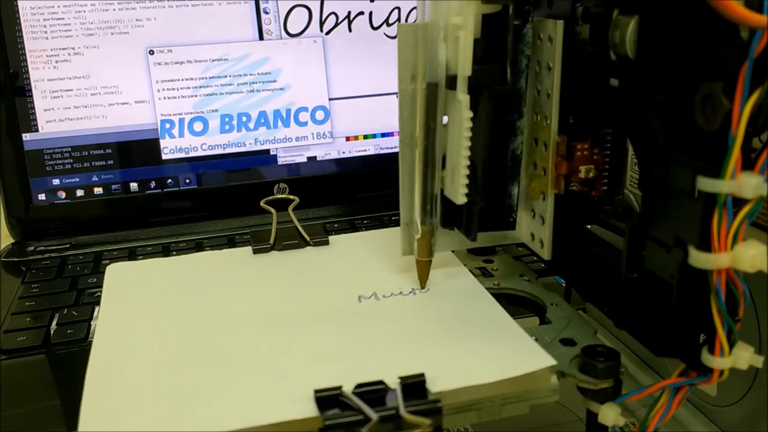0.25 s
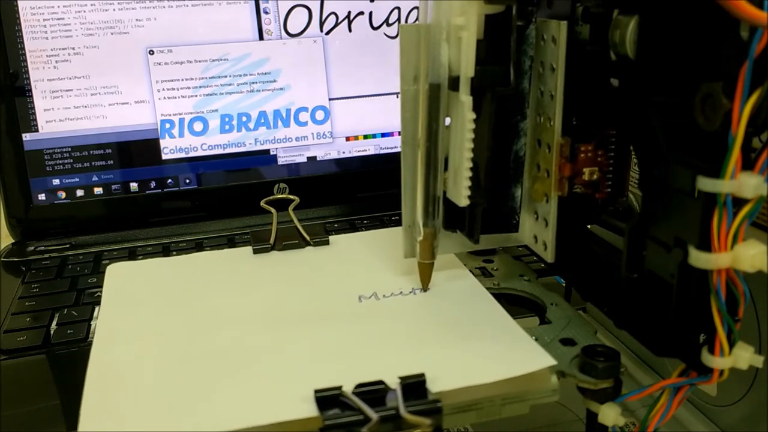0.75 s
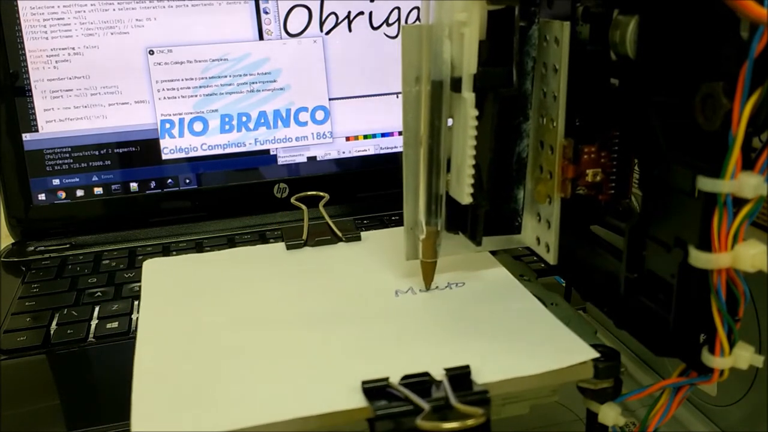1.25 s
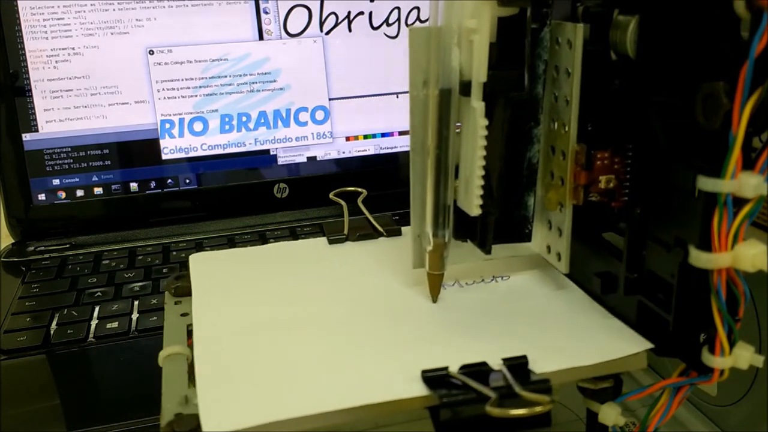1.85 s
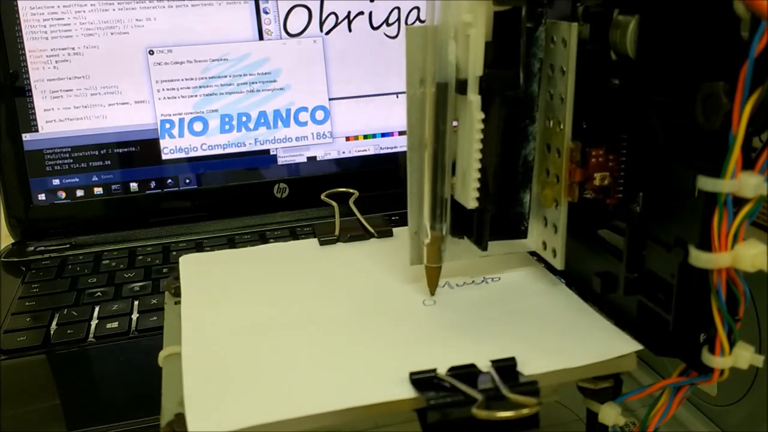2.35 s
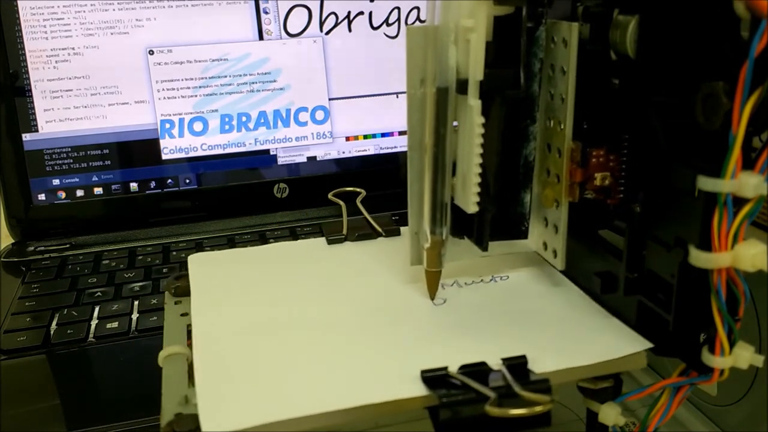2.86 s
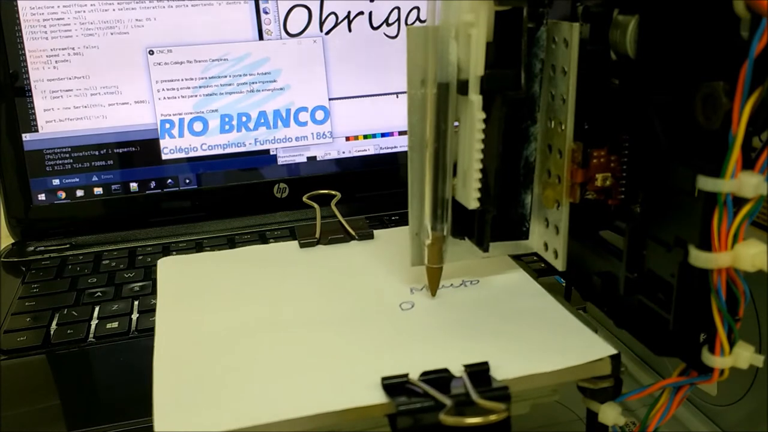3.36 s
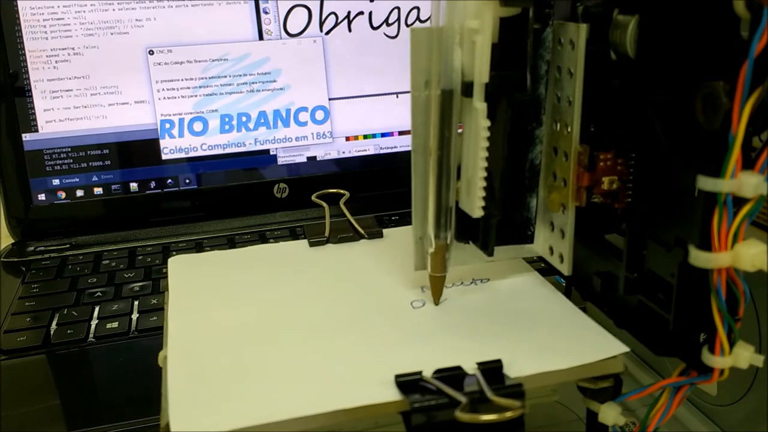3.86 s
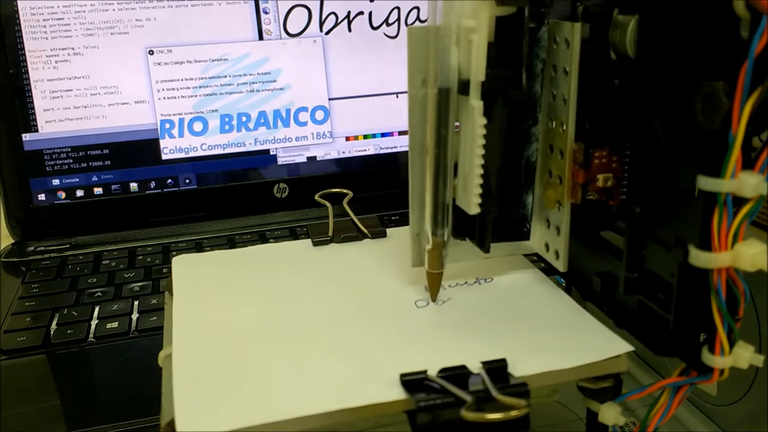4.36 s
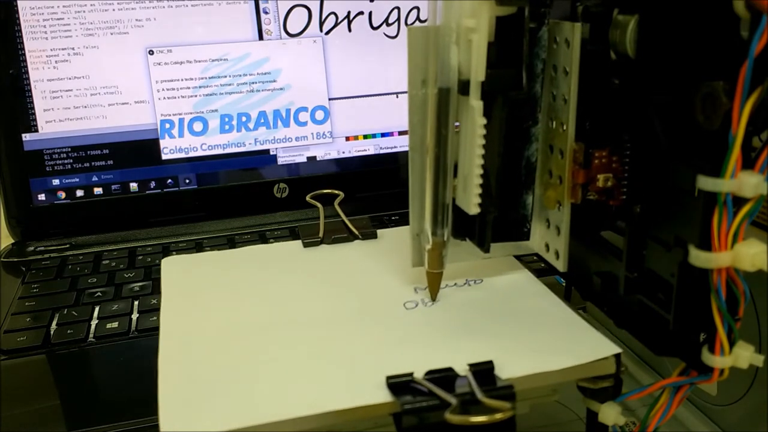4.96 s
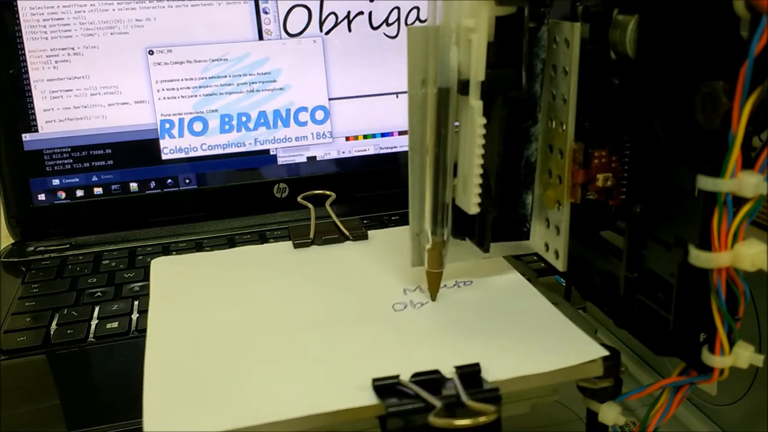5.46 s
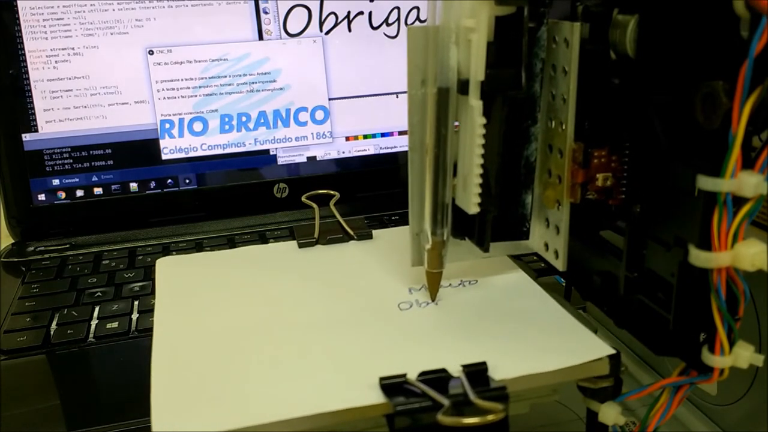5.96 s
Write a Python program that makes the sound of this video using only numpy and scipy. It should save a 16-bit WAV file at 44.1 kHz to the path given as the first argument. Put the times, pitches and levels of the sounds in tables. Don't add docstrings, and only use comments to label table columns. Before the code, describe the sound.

Close to the microphone, a small pen plotter writes with rapid irregular bursts of thin, high motor whine, each tiny step a buzzy chirp. About one second in, the stutter becomes a continuous rough whine for a long move, then the stepping returns louder. Short smooth hops interrupt it later. Underneath are a wavering laptop fan, airy hiss and faint far squeaks and clinks in an echoing room.

```python
import sys
import numpy as np
from scipy import signal
from scipy.fft import rfft, irfft
from scipy.io import wavfile
from scipy.ndimage import uniform_filter1d

SR = 44100
rng = np.random.default_rng(int(sys.argv[2]) if len(sys.argv) > 2 else 0)


def nominal_scale(level):
    x = np.asarray(level, float) / 20
    return 10 ** x


def to_wav(sig):
    pcm = np.clip(np.atleast_2d(sig), -1, 1) * 32767
    pcm = np.round(pcm).astype(np.int16)
    wavfile.write(sys.argv[1], SR, pcm.T)


N = 274302
CHOP_HZ = 1952.4


def evened(x):
    return x / np.sqrt(np.mean(abs(x) ** 2) + 1e-20)


def read(points, hz):
    f, value = np.transpose(points)
    return np.interp(np.log(hz + 1), np.log(f + 1), value)


def wander(width_hz, size=N):
    r = np.exp(-np.pi * width_hz / SR)
    z = rng.standard_normal(size) + 1j * rng.standard_normal(size)
    return evened(signal.lfilter([1], [1, -2 * r, r * r], z))


def air():
    # pitch_hz, level_db (per Hz)
    room = [(60, -46.5), (130, -46.5), (450, -16), (950, -13.5), (1500, -8.5), (3000, -11.5), (3550, -7.5),
            (4400, -13), (6800, -23), (8200, -18), (12200, -22), (13700, -32), (14100, -34), (15250, -28),
            (15700, -29)]
    frames, hz = N // 256 + 5, np.fft.rfftfreq(1024, 1 / SR)
    a, b, patches = rng.standard_normal((frames, 513, 3)).T
    patches = evened(uniform_filter1d(uniform_filter1d(patches, 8, 0), 14, 1))
    lumps = np.minimum(evened(uniform_filter1d(rng.standard_normal(frames), 16)), 1.5)
    lumps += np.interp(np.arange(frames) * 256 / SR, [.3, .6, 1.6, 2.2], [0, -.8, -.8, .3])
    lumps = lumps * np.clip(2.5 - hz[:, None] / 60, 0, 1)
    level_db = read(room, hz)[:, None] + 1.78 * patches + 8.5 * lumps
    noise = signal.istft((a + 1j * b) * nominal_scale(level_db), nperseg=1024, noverlap=768)[1][:N]
    return evened(noise) * nominal_scale(-38)


def far_clatter():
    # start_s, length_s, pitch_hz, level_db, glide_hz
    squeaks = [(0.15, 0.29, 1324, -46, -50.5), (0.33, .05, 1550, -47, 4), (0.43, 0.072, 1493, -42, 0),
               (1.518, 0.015, 3030, -43.5, -2), (2.22, .1, 2760, -43.5, -150),
               (2.25, 0.15, 2260, -42.5, 30.5), (2.28, 0.08, 2410, -39, -1), (2.7, .08, 2370, -44.5, 0),
               (2.86, .03, 2880, -43, 0), (3.04, .04, 2220, -46, 0), (3.22, 0.077, 2300, -44, -60),
               (3.31, 0.065, 2170, -41.5, -1), (3.29, .07, 2620, -46, 0), (3.28, 0.22, 2870, -49, -1),
               (3.869, 0.072, 2370, -42, 0), (4.41, 0.12, 1980, -42.5, 269), (4.53, 0.083, 2230, -45, -140),
               (4.9, 0.099, 2060, -45, 3), (5.38, .04, 2370, -48, -3), (5.5, 0.17, 1525, -49.5, 1)]
    # start_s, length_s, pitch_hz, level_db
    scrapes = [(0.284, 0.21, 4410, -43.5), (0.864, 0.16, 6880, -47.5), (1.59, 0.06, 4450, -44),
               (1.62, .04, 3430, -46), (1.66, 0.033, 4480, -42), (1.88, 0.04, 3260, -39.5),
               (2.091, 0.055, 2650, -42), (2.487, 0.046, 3090, -40), (2.54, 0.04, 2700, -39.5),
               (2.62, 0.08, 2660, -45), (4.271, 0.059, 3360, -39), (4.407, 0.13, 3260, -39.5),
               (5.246, .08, 4930, -47), (5.15, .05, 3050, -46), (5.535, 0.045, 3200, -36.5),
               (5.55, .08, 3550, -43), (5.645, 0.043, 3010, -43), (5.82, 0.038, 3120, -46)]
    # start_s, length_s, pitch_hz, level_db
    clinks = [(0.0, 0.053, 13100, -48), (0.113, 0.071, 9030, -45), (1.238, .07, 11280, -49),
              (2.864, .06, 8000, -47), (2.9, .06, 10900, -49), (5.516, 0.046, 10800, -38.5),
              (5.52, .08, 9060, -47.5), (5.516, 0.074, 12830, -50), (5.62, .04, 10400, -45),
              (5.65, .07, 9900, -47), (5.79, .03, 9700, -47), (5.815, 0.04, 10350, -42),
              (5.85, 0.14, 9530, -42)]
    # start_s, length_s, pitch_hz, level_db
    rustles = [(4.47, 0.24, 10560, -45.5), (5.44, .06, 10400, -48), (5.51, 0.08, 10760, -45),
               (5.619, 0.072, 10700, -46), (5.85, .12, 9700, -46), (5.8, 0.07, 11800, -47)]
    out = np.zeros(N)
    for rows, share in [(squeaks, .022), (scrapes, .09), (clinks, .035), (rustles, .17)]:
        for start, length, hz, db, *glide in rows:
            t = np.arange(int((length + 0.086) * SR)) / SR
            decay_db = -60 * np.maximum(t - 0.74 * length, 0) / (0.14 + 3.2 * length)
            shape = np.minimum(t / 0.006, 1) * nominal_scale(decay_db)
            grain = 0.5 + 0.5 * abs(wander(49, len(t)))
            turns = np.cumsum(hz + sum(glide) * np.minimum(t / length, 1)) / SR
            band = (wander(share * hz, len(t)) * np.exp(2j * np.pi * turns)).real
            part = out[round(start * SR):][:len(t)]
            part += (nominal_scale(db) * np.sqrt(2) * shape * grain * band)[:len(part)]
    return out


def fan_tones():
    # pitch_hz, width_hz, level_db, sink_s
    fan = [
        (245, 20, -76, 7),
        (442, 25, -64, 7),
        (484, 14, -56, 7),
        (517, 4, -55, 1.7),
        (605, 60, -62, 7),
        (779, 10, -55, .6),
        (785, 70, -61, 7),
        (700, 60, -63, 7),
        (960, 12, -64, 7),
    ]
    t = np.arange(N) / SR
    out = np.zeros(N)
    for hz, width_hz, db, sink_s in fan:
        level = nominal_scale(db - 10 * np.clip(2 * (t - sink_s), 0, 1))
        out += (level * (1 + 0.76 * wander(width_hz)) * np.exp(2j * np.pi * hz * t)).real
    return out


def travelling():
    # start_s, end_s, step_rate_hz, start_db, end_db, centre_db
    moves = [
        (.985, 1.775, 215.5, -1, 1, -2),
        (2.33, 2.46, 220, -4, -4, -4),
        (3.27, 3.452, 220, -1, -1, -9),
        (5.305, 5.378, 220, -1, -1, -7),
    ]
    # chop_multiple, side_order (of the step rate), level_db
    comb = [(2, -3, -59), (2, -2, -52), (2, -1, -51.5), (2, 0, -46), (2, 2, -53.5), (4, -3, -69),
            (4, -2, -64), (4, 0, -60), (4, 1, -61), (4, 2, -58), (4, 3, -55), (4, 4, -60), (4, 5, -64),
            (6, -5, -65), (6, -3, -65)]
    out = np.zeros(N)
    for start, end, rate, start_db, end_db, centre_db in moves:
        begin, stop = round(start * SR), round(end * SR)
        t = np.arange(begin, stop) / SR
        lines = nominal_scale(-52) * wander(450, len(t)) * np.exp(2j * np.pi * 2 * CHOP_HZ * t)
        for multiple, side, db in comb:
            line_db = db + centre_db * ((side == 0) - 0.5 * (side == -1))
            turns = (multiple * CHOP_HZ + side * rate) * t + rng.random()
            lines += nominal_scale(line_db) * (1 + 0.15 * wander(25, len(t))) * np.exp(2j * np.pi * turns)
        level = nominal_scale(np.linspace(start_db, end_db, len(t))) * signal.windows.tukey(len(t), .04)
        out[begin:stop] += np.sqrt(2) * level * lines.real
    return out


def chop(multiple):
    return np.sqrt(2) * np.exp(2j * np.pi * multiple * CHOP_HZ * np.arange(N) / SR)


def soften(x, ms):
    window = np.hanning(int(ms * SR / 1000) + 3)
    return signal.oaconvolve(x, window / window.sum(), "same")


def coil_states():
    # start_s, length_ms, level_db (at 2 x chop)
    strokes = [(0.0, 12.5, -43), (0.016, 12.4, -48), (0.037, 10, -37), (0.058, 3.5, -36),
               (0.072, 7.6, -38), (0.079, 12, -40), (0.094, 4.4, -41), (0.105, 9.5, -37),
               (0.118, 19, -38.5), (0.145, 6.3, -38), (0.16, 12.2, -36.0), (0.177, 6.3, -42.6),
               (0.188, 14, -37.9), (0.203, 5.0, -37.4), (0.211, 14, -37.4), (0.227, 6.3, -41.8),
               (0.245, 9.2, -36), (0.258, 13, -37), (0.283, 5.9, -35), (0.302, 13, -38.5),
               (0.33, 9.2, -36.5), (0.357, 7.7, -34), (0.369, 15.2, -38.5), (0.389, 4.7, -40),
               (0.396, 9.4, -35), (0.413, 4.6, -37), (0.562, 4.0, -38), (0.595, 11, -37),
               (0.612, 14.5, -34.5), (0.629, 4.4, -40.9), (0.65, 11, -36), (0.669, 8.3, -36),
               (0.684, 8.7, -38.6), (0.701, 14, -38.7), (0.727, 13, -33.5), (0.744, 10.7, -35.6),
               (0.756, 5.2, -35), (0.765, 11, -35.8), (0.785, 7.0, -34), (0.795, 4.9, -38.6),
               (0.814, 19, -39.5), (0.836, 9.8, -35.5), (0.85, 5.5, -42), (0.864, 6.6, -43.4),
               (0.881, 13, -37), (0.898, 14, -36), (1.779, 10.7, -30), (1.809, 4.7, -39),
               (1.825, 12, -35), (1.844, 11.5, -30), (1.858, 4.1, -41), (1.866, 14.3, -32),
                      (1.882, 5.8, -38.2), (1.898, 8.7, -34), (1.945, 5.9, -41.6), (1.954, 8.1, -32),
                      (1.967, 15, -32), (1.99, 12.7, -32.5), (2.011, 10.2, -33.4), (2.037, 10.3, -36),
                      (2.065, 11.4, -31), (2.092, 8.3, -30.5), (2.116, 9.7, -30.5), (2.136, 12, -30),
                      (2.177, 9.6, -33), (2.267, 12, -29.5), (2.288, 12, -32.2), (2.31, 12, -34),
                      (2.323, 16.9, -40), (2.523, 15, -31.9), (2.544, 12, -32.2), (2.592, 9.5, -28),
                      (2.627, 9, -32), (2.643, 6.3, -37), (2.656, 10.0, -35.6), (2.67, 14, -41.2),
                      (2.686, 11.9, -36.9), (2.719, 10.4, -31), (2.738, 13, -32.5), (2.782, 7.8, -33),
                      (2.799, 17, -34), (2.865, 12, -36), (2.889, 9.1, -29.5), (2.905, 3.9, -35),
                      (2.916, 10.0, -33.5), (2.946, 11, -34), (2.981, 8.8, -31.5), (3.013, 11.6, -37.9),
                      (3.03, 11.5, -31), (3.049, 11, -30), (3.07, 6.8, -32), (3.103, 10.9, -32.4),
                      (3.122, 15, -31.1), (3.144, 11.6, -30.5), (3.163, 17, -31), (3.513, 16, -33.5),
               (3.537, 13, -33), (3.55, 12.8, -29.5), (3.567, 13, -37), (3.587, 12.6, -31.5),
                     (3.602, 13, -28.7), (3.647, 14, -30.5), (3.669, 9.9, -32), (3.681, 5.5, -35),
                     (3.694, 8.9, -31.3), (3.708, 12.6, -30.5), (3.727, 11.4, -30), (3.743, 16, -35.2),
                     (3.761, 9.6, -30.5), (3.777, 11.7, -43), (3.79, 8.6, -40.5), (3.824, 11, -29),
                     (3.838, 11.6, -32.4), (3.882, 6.5, -36), (3.89, 11, -28.5), (3.905, 12, -29.5),
                     (3.924, 11, -32), (3.942, 11, -33.5), (3.959, 9.4, -33), (3.979, 10, -33),
                     (3.996, 9.4, -32), (4.012, 10.7, -30.4), (4.029, 12, -32), (4.044, 11, -32),
                     (4.058, 14, -30), (4.105, 8.5, -33), (4.12, 13.3, -35.5), (4.137, 13.2, -36),
                     (4.151, 12, -34.8), (4.175, 6.1, -29), (4.192, 10, -31), (4.21, 11, -32.3),
                     (4.247, 9.7, -31), (4.263, 10.7, -34.6), (4.337, 9.2, -38.1), (4.353, 5.2, -31),
                     (4.37, 9.1, -34), (4.52, 13, -32.9), (4.535, 5.8, -35.8), (4.553, 11.6, -30),
                     (4.566, 12.0, -30), (4.58, 11, -30), (4.596, 7.7, -36.9), (4.614, 8.8, -32),
               (4.629, 20, -33.5), (4.755, 14, -28), (4.771, 10, -38.0), (4.793, 16, -29.7),
                    (4.827, 12, -29), (4.845, 13, -29.5), (4.867, 10, -31.0), (4.887, 10, -32.5),
                    (4.941, 9.6, -33), (4.967, 12.1, -43), (4.988, 8.5, -42), (5.041, 6.9, -35.0),
                    (5.067, 11.5, -30.5), (5.082, 10, -29.5), (5.099, 6.2, -34), (5.135, 7.5, -42.1),
                    (5.16, 12, -33), (5.185, 13, -31), (5.202, 6.2, -34), (5.211, 13, -33.5),
                    (5.44, 10, -30), (5.454, 12, -30), (5.483, 10.2, -33.6), (5.496, 12, -33),
                    (5.518, 12, -31), (5.534, 4.3, -39.8), (5.54, 14, -31), (5.563, 8.9, -33),
                    (5.577, 4.5, -40.0), (5.599, 11, -32), (5.616, 9.4, -30), (5.628, 12.2, -30),
                    (5.645, 22, -31), (5.665, 20, -33), (5.688, 12.0, -36), (5.767, 10.3, -34.2),
                    (5.78, 11.2, -28.5), (5.852, 11.5, -30.5), (5.878, 13, -37), (6.039, 9.8, -30.5),
                    (6.05, 11.6, -33.5), (6.065, 12, -32.5), (6.077, 11.3, -37.1), (6.121, 10, -40),
                    (6.131, 8.4, -37), (6.212, 7.9, -42)]
    # start_s, length_ms, level_db
    rests = [(0.42, 82, -34.5), (0.511, 43, -35), (0.917, 72, -36), (1.924, 17, -25.5), (2.205, 53, -29.5),
             (2.47, 47, -31.5), (2.819, 43, -27.5), (3.182, 18, -29.5), (3.209, 56, -30.5),
             (3.457, 41, -29.5), (3.855, 22, -30.0), (4.075, 28, -29), (4.292, 38, -30.5),
             (4.381, 25.6, -27.5), (4.409, 50, -30), (4.466, 36, -28.5), (4.668, 25, -28.5),
             (4.727, 23, -32), (5.002, 34.6, -30), (5.109, 10, -30), (5.238, 65, -31), (5.38, 45, -30),
             (5.725, 26, -30), (5.799, 32, -31), (5.923, 44.5, -30), (5.971, 52, -32.5), (6.096, 21.5, -30),
             (6.157, 42, -31)]
    states = [*strokes, *rests]
    return sorted(tuple(state) for state in states)


def held(sag, settle_ms, kick, advance, scatter):
    out = np.zeros(N, complex)
    jumps = np.cumsum(advance + scatter * rng.standard_normal(400))
    for (start, ms, db), jump in zip(coil_states(), jumps):
        settling = np.exp(-np.arange(int(ms * SR / 1000)) / (settle_ms * SR / 1000))
        envelope = nominal_scale(db + 0.52) * (1 + kick * settling) * np.exp(1j * (jump + sag * settling))
        part = out[round(start * SR):][:len(settling)]
        part += envelope[:len(part)]
    return out


def writing():
    # time_s, level_db (at 1 x chop)
    coupling = [(0.0, -54), (.3, -45.5), (.95, -47.5), (1.05, -55), (2.0, -52.5), (2.13, -46),
                (2.36, -43.5), (2.6, -53.5), (3.05, -43.5), (3.2, -58.5), (3.8, -56), (4.1, -49.5),
                (4.35, -57), (4.5, -47.5), (4.75, -54), (5.28, -43.5), (5.62, -55), (6.1, -43.5)]
    first_db = np.interp(np.arange(N) / SR, *np.transpose(coupling))
    third_db = -56 + 0.24 * (first_db - first_db.mean())

    second = soften(held(sag=2.2, settle_ms=10, kick=0.23, advance=-2.75, scatter=0.75), ms=3.2)
    ring = np.exp((-np.pi * 170 - 2j * np.pi * 10) / SR)
    second = np.roll(signal.lfilter([1 - abs(ring)], [1, -ring], second), -60)

    loudness = abs(second)
    average = uniform_filter1d(loudness, 40000)
    busy = np.clip(4 * uniform_filter1d(loudness, 1100) / average, 0, 1)
    gate = 0.55 + 0.55 * loudness / (uniform_filter1d(loudness, 4000) + 0.003)
    steady = uniform_filter1d(second.real, 900) + 1j * uniform_filter1d(second.imag, 900)
    knock = np.minimum(abs(second - steady), loudness)

    out = (second + nominal_scale(-10.5) * busy * average * wander(47)) * chop(2)
    out += nominal_scale(-14) * (knock + 0.012 * busy) * wander(150) * chop(1.912)
    out += nominal_scale(-15.5) * (knock + 0.008 * busy) * wander(60) * chop(2.072)
    out += nominal_scale(-10) * knock * wander(30) * chop(2.018)
    flutter = 0.62 * wander(56) + 0.2 * wander(10) + 0.5
    out += nominal_scale(first_db + 2.5) * (0.46 + 0.47 * busy) * flutter * chop(1)
    out += nominal_scale(third_db) * gate * (1.36 * wander(80) + 1.01 * wander(12)) * chop(3)
    out += nominal_scale(-51) * busy * gate * (1.07 * wander(96) + 0.92 * wander(10.7)) * chop(4)
    out += nominal_scale(-65) * busy * wander(40) * chop(5)
    out += nominal_scale(-55) * busy * gate * (0.75 * wander(80) + 0.5 * wander(25)) * chop(6)
    out += nominal_scale(-62.5) * (0.7 + 0.3 * busy) * wander(130) * chop(8)
    return out.real


def ports(near, diffuse, other):
    # pitch_hz, lead_rad
    lead = [(60, 0.9), (200, 2.2), (1550, 0.8), (3900, -.55), (4650, -.6), (5700, -2.4), (6700, -3.05),
            (8790, -4.5), (10700, -6.3), (13900, -9.4), (14700, -9.5), (15700, -10.6)]
    # pitch_hz, likeness (0-1)
    likeness = [(60, .35), (200, 0.65), (900, .6), (2500, 0.8), (5500, 0.5), (7000, .8), (10700, .85),
                (12800, .62), (14100, .95), (15300, 0.7)]
    # pitch_hz, tilt_db
    tilt = [(60, 0), (150, 2), (380, -4), (950, -1.5), (2380, 0.5), (5980, -2.5), (15000, -1)]
    hz = np.fft.rfftfreq(N, 1 / SR)
    half = np.exp(0.5j * read(lead, hz)) * nominal_scale(read(tilt, hz) / 2)
    like = np.clip(read(likeness, hz), 0, 1)
    direct = rfft(near)
    same = np.sqrt((1 + like) / 2) * rfft(diffuse)
    apart = np.sqrt((1 - like) / 2) * rfft(other)
    left = (nominal_scale(2.5) * direct + same + apart) * half
    right = (nominal_scale(-0.6) * direct + same - apart) / half
    lift = 1 / np.maximum(abs(half + 1 / half) / 2, 0.45)
    return irfft(lift * np.array([left, right]), N)


def scene():
    near = writing() + travelling() + fan_tones()
    return ports(near, air() + far_clatter(), air() + far_clatter())


def top_cut(x):
    return signal.sosfilt(signal.butter(12, 15850, fs=SR, output="sos"), x)


def record(dry):
    low_pass = signal.firwin(1023, 15730, window=("kaiser", 9), fs=SR)
    limited = signal.oaconvolve(dry, low_pass[None], "same")
    return top_cut(limited)


dry = scene()
out = record(dry)
to_wav(out)
```